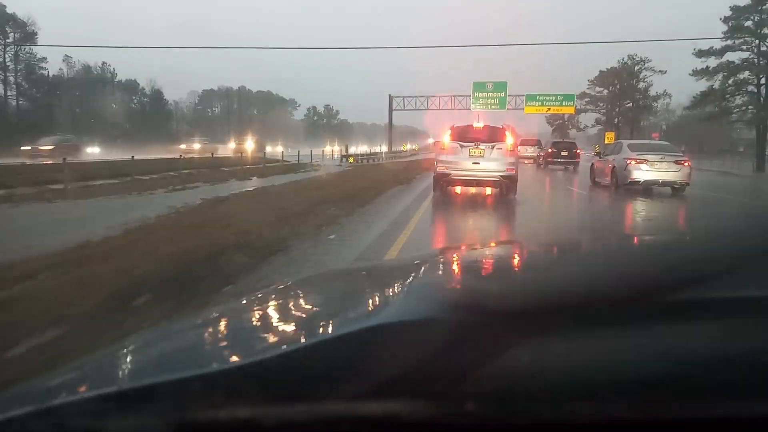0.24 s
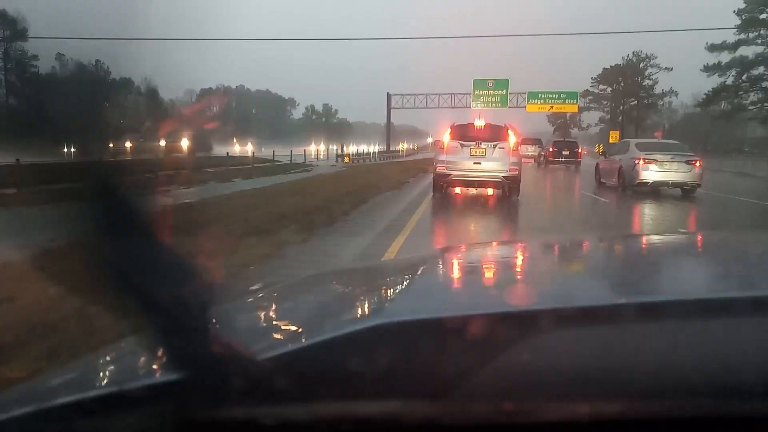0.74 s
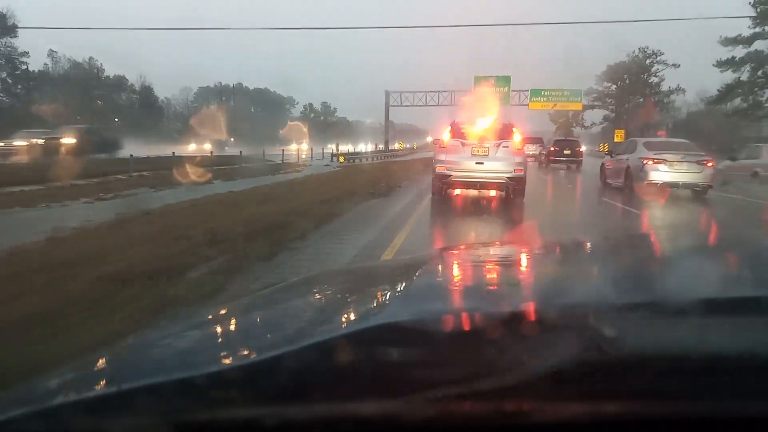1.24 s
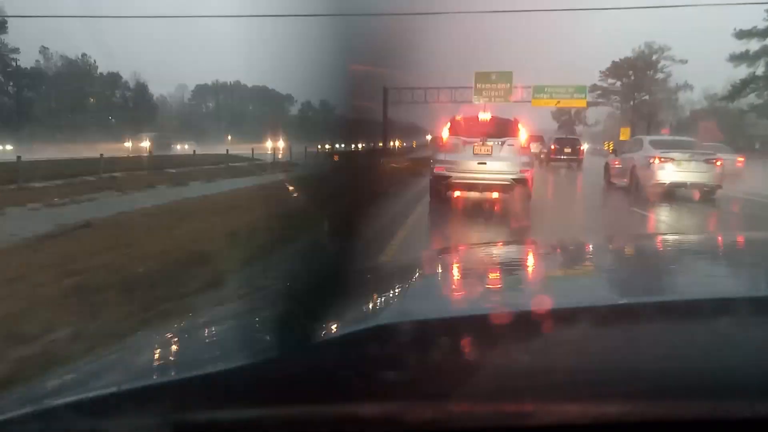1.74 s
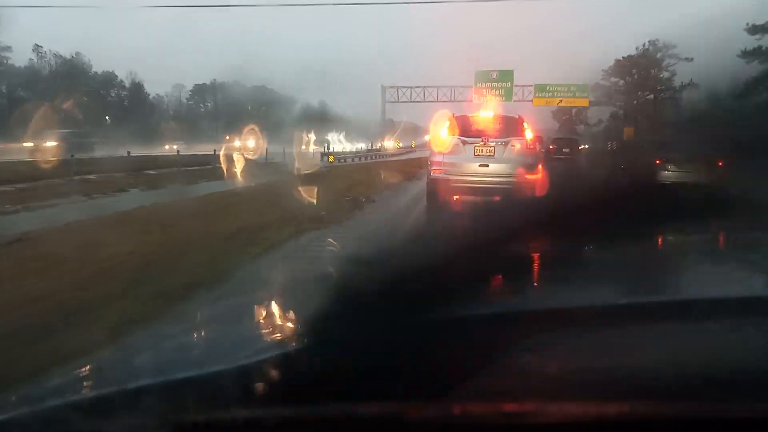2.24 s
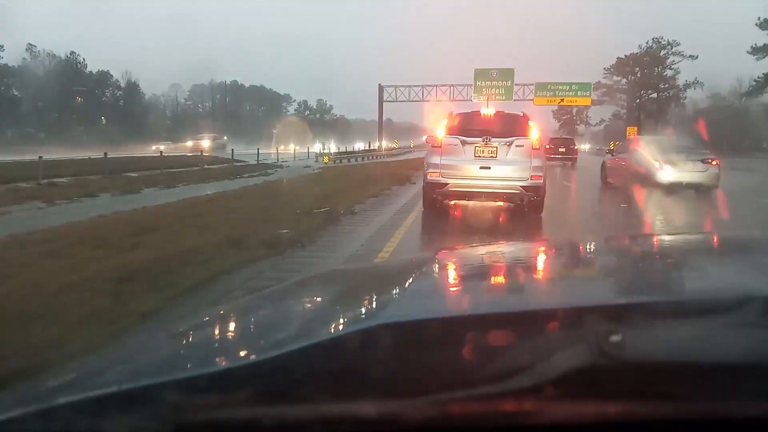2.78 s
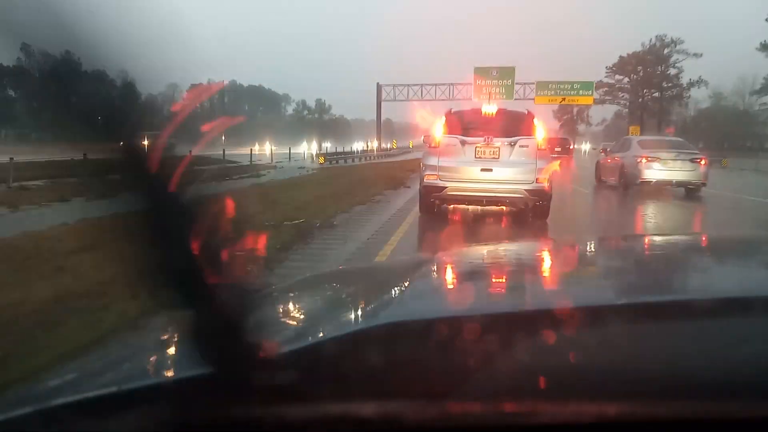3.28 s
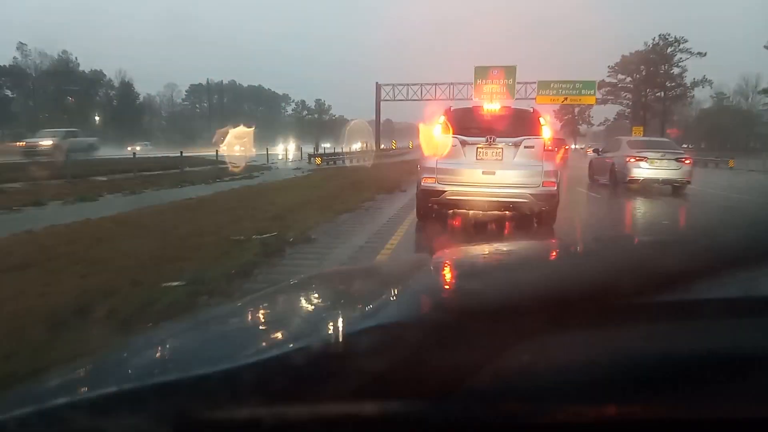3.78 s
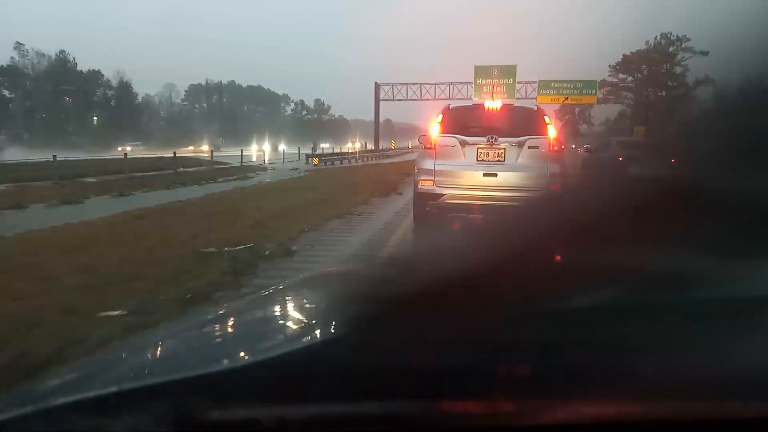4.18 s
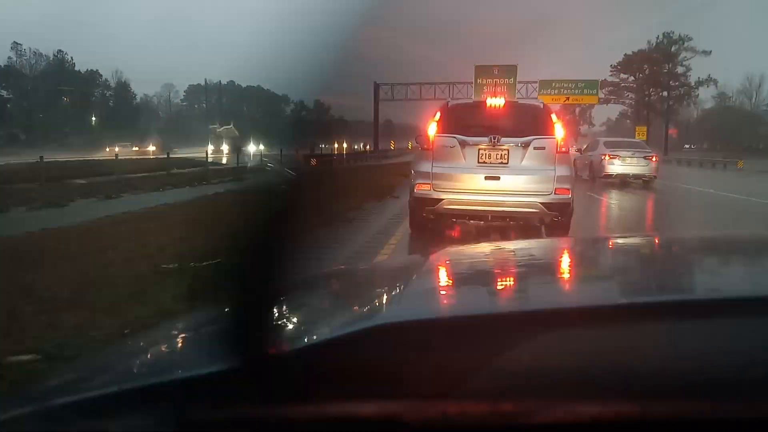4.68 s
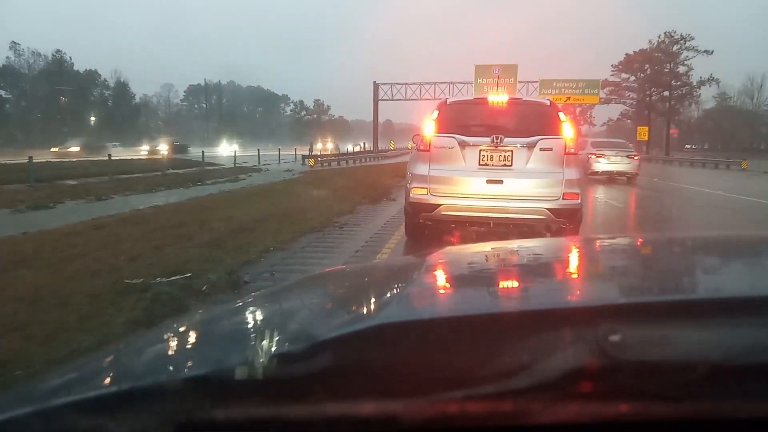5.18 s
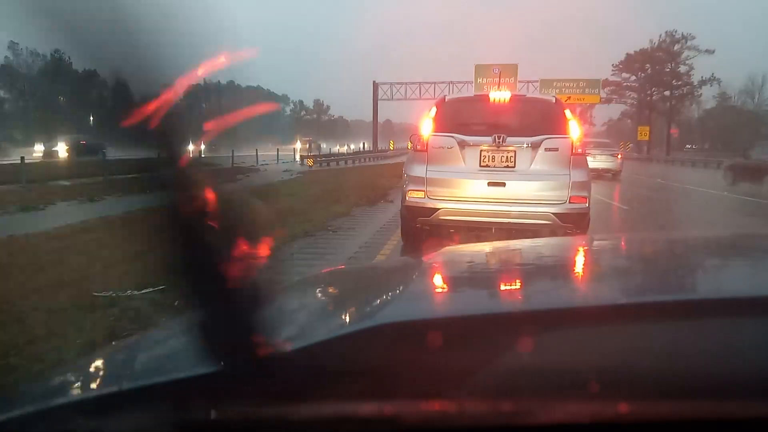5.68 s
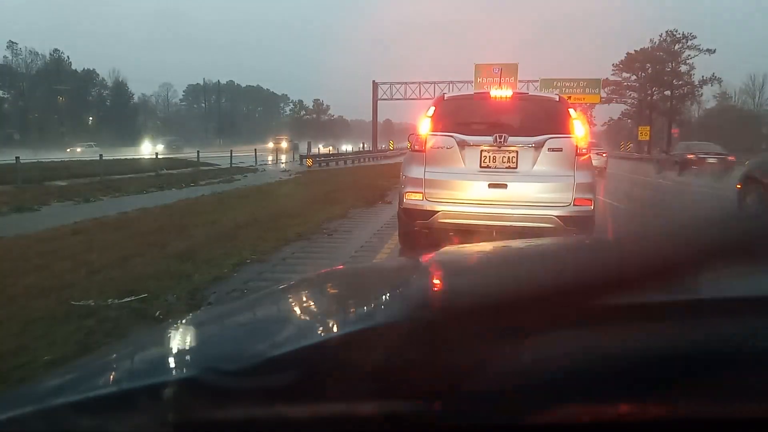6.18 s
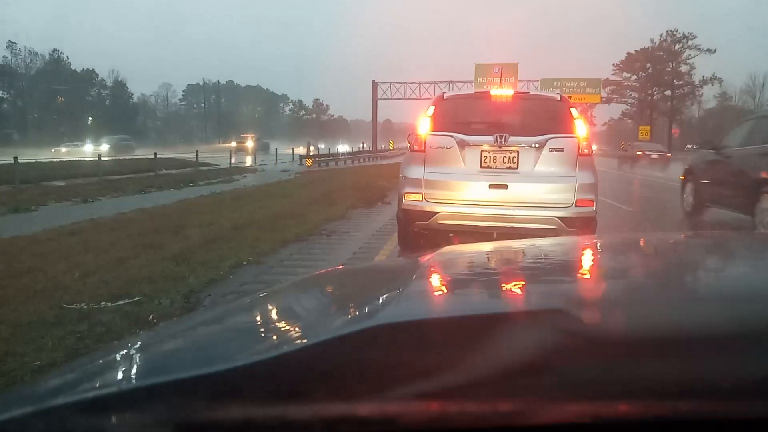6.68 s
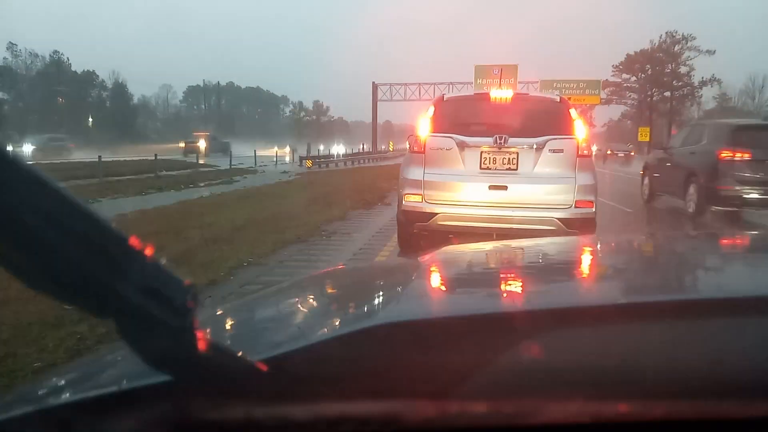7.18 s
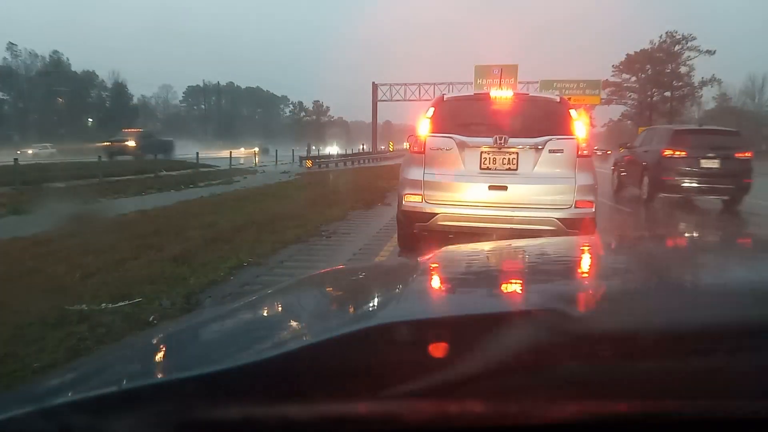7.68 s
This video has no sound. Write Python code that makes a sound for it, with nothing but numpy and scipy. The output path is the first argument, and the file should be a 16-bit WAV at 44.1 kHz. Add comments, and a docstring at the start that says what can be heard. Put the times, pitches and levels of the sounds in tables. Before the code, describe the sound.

From inside a car creeping along a wet highway, fast wipers beat back and forth with soft, round thuds over a low rumble. Dense rain taps and ticks on the glass and roof close to the microphone, with more rain washing behind it. Tyres in the next lane give a dull swish early on and a longer one later, while the finest ticks on the windscreen thin out towards the end.

```python
"""Inside a car creeping along a wet highway in heavy rain, heard at two small microphone ports.
From the start, drops patter on roof and glass over a wash of distant rain; the body drones and the
cabin booms near 90 Hz. From 0.1 s the wipers thump every 0.4 s, at outer end and park in turn,
and judder on leaving park. Tyre spray from the next lane swells at 0.5 s and again from 5 s on.
The finest ticks on the windscreen fade towards the end, near 8 s."""
import sys
import numpy as np
from scipy import signal
from scipy.fft import rfft, irfft
from scipy.io import wavfile
from scipy.ndimage import uniform_filter1d

SR = 44100
rng = np.random.default_rng(int(sys.argv[2]) if len(sys.argv) > 2 else 0)


def log_audio(samples):
    """Write samples as a 16-bit WAV file to the path given in sys.argv[1]."""
    # one column per channel
    frames = np.atleast_2d(samples).T
    # limit to full scale, then quantise
    limited = np.clip(frames, -1, 1)
    pcm = np.round(limited * 32767).astype(np.int16)
    wavfile.write(sys.argv[1], SR, pcm)


N = 349668

# Water levels: t/s, distant wash/dB, near patter/dB, fine ticks/dB, tyre spray/dB
RAIN_LEVELS = [(0.05, -37, -27, -39.5, -50), (0.55, -30.5, -29, -41.5, -36), (1.36, -31, -28.5, -43.5, -40),
               (1.84, -34, -31.5, -52.5, -44.5), (2.63, -31, -30, -49, -42), (4.09, -33.5, -29.5, -51, -38),
               (4.71, -32.5, -29.5, -50, -39.5), (5.03, -31, -30.5, -53, -33),
               (5.98, -29.5, -28.5, -49, -30), (6.32, -31, -30, -50, -33), (7.18, -31.5, -29, -53, -31),
               (7.9, -32, -30.5, -63, -34)]
# Road excitation, fading as the car slows: t/s, lower cabin mode/dB, upper mode/dB, body drone/dB
ROAD_LEVELS = [(0.0, -16, -13.5, -18.5), (0.4, -25, -19.5, -21), (0.77, -20, -18.5, -20),
               (0.99, -22.5, -16, -21.5), (2.58, -21.5, -22.5, -21), (3.73, -24, -17.5, -20),
               (4.35, -30, -22, -21.5), (4.7, -25, -26, -22.5), (6.25, -34, -20.5, -20.5),
               (6.63, -23.5, -36, -21), (6.89, -15.5, -26, -22), (7.07, -42, -31, -22.5),
               (7.44, -28, -30, -20), (7.93, -16, -31, -22)]
# Spectral shapes: f/Hz, relative density/dB
WASH_SPECTRUM = [(210, -37), (350, -3.5), (437, -9.5), (694, -8), (789, -26), (986, -19), (1360, -10.5),
                 (1520, -20.5), (2080, -19), (2910, -22), (3360, -20.5), (7330, -34.5), (9160, -51),
                 (13600, -42), (15800, -41)]
SPRAY_SPECTRUM = [(300, -17), (450, 2.5), (650, 4.5), (900, 0.5), (1300, -35)]
DRONE_SPECTRUM = [(15, -66), (25, -32), (37, -1.5), (63, -9.5), (85, -11), (101, -5.5), (168, -11),
                  (292, -11), (335, -15), (438, -15), (549, -20), (786, -27), (900, -33.5), (1170, -47),
                  (1980, -120)]
DROP_SPECTRUM = [(290, -34.5), (500, 0.5), (794, -6.5), (971, -6.5), (1350, -11), (1500, -11.5),
                 (2090, -15), (3360, -15.5), (3770, -16.5), (7330, -27), (9100, -39), (13200, -34.5),
                 (15800, -47)]
# Resonances of panels and glass, plus a microphone colour peak near 7.9 kHz: f/Hz, width/Hz, lift/dB
COLOUR_PEAKS = [(117.1, 6.2, 5), (301, 32, 2), (7900, 420, 3), (800, 73, 4), (1485, 58, 8), (1583, 120, 5),
                (1770, 61, 5), (1910, 46, 3), (2478, 45, 5), (2330, 140, 1.4), (2660, 33, 3),
                (3340, 86, 3.5), (4150, 65, 4)]
# Lowest modes of the cabin air: f/Hz, rms wander/Hz
CABIN_MODES = [(81, 4.05), (96, 9.07)]
# Noise coherence between ports: f/Hz, left-right correlation
COHERENCE = [(60, 0.73), (110, 0.88), (200, 0.89), (380, 0.75), (700, 0.016), (1290, -0.23), (2380, -0.2),
             (4400, -0.0038), (8120, -0.67), (15000, 0.083)]
# Port mismatch: f/Hz, left minus right/dB
PORT_BALANCE = [(60, -1.5), (130, 0.5), (290, 2), (640, 1.5), (1410, 0.5), (3100, 0.5), (6820, -2),
                (15000, -4.5)]
# Largest drops: t/s, glass tap/dB, bright tick/dB, panel knock/dB, left minus right before limit/dB
BIG_DROPS = [(0.0548, -26, -38, -22, 3), (0.092, -23, -37, -21, -2), (0.1246, -33, -36, -36, -1),
             (0.1817, -21, -27, -19, 2), (0.2019, -25, -29, -29, 5), (0.329, -26, -31, -26, 1),
             (0.4975, -22, -37, -21, 1), (0.5196, -23, -29, -22, 1), (0.5316, -19.5, -36, -30, 2),
             (0.5506, -19, -33, -28, -3), (0.7642, -24, -42, -25, -7), (0.8383, -24, -30, -23, 7),
             (0.989, -19, -44, -33, 3), (1.0794, -20, -31, -28, 2), (1.1784, -25, -32, -27, -2),
             (1.2206, -24, -29, -21, 10), (1.2996, -28, -30, -24, -2), (1.3603, -25, -29, -31, 3),
             (1.3932, -24, -39, -35, -3), (1.4898, -23, -35, -17.5, 5), (1.5778, -21, -29, -19, 3),
             (1.6383, -23, -46, -33, 2), (1.822, -23, -31, -29, -2), (1.8976, -26, -28, -30, -7),
             (1.9789, -24, -34, -28, 0), (2.0371, -25, -44, -29, -9), (2.1332, -36, -31, -24, -2),
             (2.207, -25, -39, -28, -1), (2.2391, -28, -27, -22, 2), (2.253, -25, -34, -20, 1),
             (2.374, -26, -35, -29, 6), (2.507, -23, -30, -17, 2), (2.5502, -22, -35, -18, 1),
             (2.601, -27, -34, -19, 0), (2.6167, -25, -41, -23, -2), (2.694, -23, -31, -20, 2),
             (2.84, -27, -42, -22, 5), (2.88, -22, -36, -34, -1), (2.9068, -22, -25.5, -21, -3),
             (2.965, -27, -41, -18, 0), (2.9827, -23, -28, -20, 3), (3.0096, -29, -28, -23, -2),
             (3.1094, -25, -43, -16.5, 0), (3.1784, -28, -35, -26, 0), (3.246, -28, -39, -32, -1),
             (3.2688, -23, -40, -16, 2), (3.412, -23, -34, -18, 3), (3.446, -34, -46, -15.5, 2),
             (3.829, -24, -30, -25, -2), (4.02, -22, -32, -20, -2), (4.243, -32, -33, -32, 0),
             (4.2761, -31, -36, -32, 0), (4.2886, -26, -42, -33, 0), (4.3319, -29, -34, -33, 2),
             (4.3924, -32, -33, -27, 1), (4.4344, -22, -41, -23, 5), (4.4949, -31, -34, -32, 0),
             (4.5295, -31, -37, -32, 0), (4.5858, -31, -35, -31, 0), (4.599, -28, -31, -24, 1),
             (4.7396, -34, -38, -34, 0), (4.8499, -26, -43, -30, 2), (4.8759, -29, -41, -15, 1),
             (4.891, -27, -42, -20, -1), (4.9948, -27, -44, -22, 5), (5.1976, -31, -38, -32, -2),
             (5.2409, -29, -40, -32, 0), (5.3103, -29, -38, -32, 0), (5.3581, -31, -34, -32, 0),
             (5.388, -27, -40, -25, 0), (5.4618, -29, -38, -32, 0), (5.5658, -30, -39, -32, 0),
             (5.6571, -30, -39, -21, 4), (5.8393, -24, -43, -28, -1), (5.8507, -25, -46, -15.5, -5),
             (5.923, -31, -33, -32, 0), (6.032, -30, -35, -22, 7), (6.0657, -19.5, -42, -25, -2),
             (6.0899, -25, -44, -20, 1), (6.6037, -23, -42, -23, -5), (6.7542, -28, -30, -28, 3),
             (7.251, -36, -29, -22, -2), (7.324, -32, -46, -33, 2), (7.356, -34, -37, -24, 0),
             (7.4311, -33, -41, -32, 0), (7.6597, -23, -50, -26, -4), (7.8674, -32, -51, -21, 3)]
# Tap, tick and knock: low/Hz, high/Hz, t60/s
DROP_BANDS = [(2000, 6000, .011), (6000, 15800, .0045), (600, 2000, .01)]
# Blade reversals, outer end and park in turn:
# t/s, thump/dB, lower cabin mode/dB, upper mode/dB, drone lift/dB
REVERSALS = [(0.097, -4, -17, -21, -3), (0.53, -9, -9, -14.5, 3.5), (0.898, -12, -8.5, -7.5, 2),
             (1.297, -6, -14, -28, 3.5), (1.688, -3.5, -12.5, -17, 1.5), (2.083, -8, -13.5, -13.5, 4),
             (2.492, -4, -24, -15, 2), (2.9, -16, -11.5, -18.5, 4), (3.29, -4.5, -11, -10, -3.5),
             (3.7, -8, -11.5, -12, 2.5), (4.079, -2, -13.5, -21, -0.5), (4.489, -6.5, -13.5, -18, 5),
             (4.869, -3.5, -13.5, -18, 3), (5.298, -4, -14, -15.5, 6.5), (5.668, -5, -11, -18, 0.5),
             (6.088, -3.5, -15, -16.5, 2.5), (6.47, -3.5, -14.5, -18, 4.5), (6.889, -3, -19, -15.5, 6),
             (7.258, -2.5, -11.5, -18, -0.5), (7.657, -5, -9, -20, 4)]
# Judders, relative to the park jolt: delay/s, thump/dB, lower cabin mode/dB, upper mode/dB
PARK_JUDDERS = [(0.095, -2.5, -4, 1.5), (0.19, -9.5, -19, -0.5), (0.26, -10.5, -10.5, -7.5)]
# Frame under the windscreen: f/Hz, relative level/dB, t60/s
FRAME_MODES = [(85.4, 3.5, 0.098), (115, 5.5, 0.068), (152.1, -11, 0.2), (190, -15.5, 0.092),
               (206, -3, 0.067), (241.5, 4, 0.051), (293.6, -8, 0.12)]

MODE_LAG_S, MODE_SWELL_S = (0.025, 0.0035), (0.081, 0.053)  # lower, upper mode
DRAG_RISE_S, DRAG_FADE_S = 0.052, (0.043, 0.47)  # fade: outer end, park
SPLAT_SAMPLES, PORT_LAG_SAMPLES, CUTOFF_HZ = 3000, 24, 15950
LEFT_RIGHT = np.array([[1], [-1]])


def amp(db):
    """dB to gain."""
    return 10 ** (np.asarray(db) / 20)


def unit_rms(x):
    """Scale to rms 1."""
    return x / np.sqrt(np.mean(x ** 2) + 1e-20)


def at_hz(table, hz):
    """Table interpolated over log frequency."""
    f, value = np.transpose(table)
    return np.interp(np.log(hz + 1), np.log(f + 1), value)


def curves(table):
    """Table columns interpolated over time, per sample."""
    t_s, *columns = np.transpose(table)
    return [np.interp(np.arange(N) / SR, t_s, column) for column in columns]


def peak_lift_db(hz):
    """Summed colour peaks of panels, glass and microphone."""
    return sum(db / (1 + (2 * (hz - f) / width) ** 2) for f, width, db in COLOUR_PEAKS)


def convolve(x, taps):
    """Causal convolution, cut to the input length."""
    return signal.oaconvolve(x, taps, axes=1)[:, :x.shape[1]]


def shaped_noise(spectrum, frame, patch_db):
    """Partly coherent stereo noise: given spectrum, colour peaks and drifting patches."""
    hz = np.fft.rfftfreq(frame, 1 / SR)
    re, im, other_re, other_im, patches = rng.standard_normal((4 * N // frame + 5, len(hz), 5)).T
    patches = unit_rms(uniform_filter1d(uniform_filter1d(patches, size=9, axis=0), size=9, axis=1))
    coherence = np.clip(at_hz(COHERENCE, hz), -1, 1)[:, None]
    left = re + 1j * im
    right = coherence * left + np.sqrt(1 - coherence ** 2) * (other_re + 1j * other_im)
    gain = amp((at_hz(spectrum, hz) + peak_lift_db(hz))[:, None] + patch_db * patches)
    _, out = signal.istft(np.array([left, right]) * gain, nperseg=frame, noverlap=frame * 3 // 4)
    return unit_rms(out[:, :N])


def distant_rain():
    """Far drops merged into a wash."""
    return shaped_noise(WASH_SPECTRUM, frame=512, patch_db=0.5)


def tyre_spray():
    """Spray of the next lane, dulled by the doors."""
    return shaped_noise(SPRAY_SPECTRUM, frame=1024, patch_db=0.0)


def body_drone():
    """Road rumble of the panels; the strain of the wiper drive shifts its level, mostly up."""
    t = np.arange(N) / SR
    level_db = curves(ROAD_LEVELS)[2]
    for k, (t_s, *_, lift_db) in enumerate(REVERSALS):
        exponent = np.where(t < t_s, (t - t_s) / DRAG_RISE_S, (t_s - t) / DRAG_FADE_S[k % 2])
        level_db += lift_db * np.exp(exponent)
    return amp(level_db) * shaped_noise(DRONE_SPECTRUM, frame=4096, patch_db=0.5)


def jolts():
    """Reversals plus judders after each park: t/s, thump/dB, lower mode/dB, upper mode/dB."""
    return [np.add(row[:4], offset) for k, row in enumerate(REVERSALS)
            for offset in [(0.0006, 0, 0, 0)] + PARK_JUDDERS * (k % 2)]


def jolt_power():
    """Power fed into each cabin mode: one round swell per jolt."""
    power = np.zeros((2, N + 3 * SR))  # 1 s lead-in
    for t_s, _, *levels_db in jolts():
        for mode, lag_s, half_s, db in zip(power, MODE_LAG_S, MODE_SWELL_S, levels_db):
            t = np.arange(-half_s, half_s, 1 / SR)
            start = round((t_s + lag_s - half_s + 1) * SR)
            mode[start:][:len(t)] += amp(2 * db) * np.cos(np.pi * t / half_s / 2) ** 4
    return power[:, SR:SR + N]


def cabin_boom(flutter_db):
    """Two beating air modes driven by road and wipers; pitch and level wander quickly."""
    out = np.zeros(N)
    drives = zip(CABIN_MODES, curves(ROAD_LEVELS), jolt_power())
    for (hz, wander_hz), road_db, wiper_power in drives:
        smooth = uniform_filter1d(uniform_filter1d(rng.standard_normal((2, N)), size=1200), size=1200)
        wander, flutter = map(unit_rms, smooth)
        power = amp(2 * (road_db + flutter_db * flutter)) + wiper_power
        out += np.sqrt(2 * power) * np.sin(2 * np.pi * np.cumsum(hz + wander_hz * wander) / SR)
    return out


def drop_filter():
    """Causal taps: drop spectrum plus colour peaks."""
    hz = abs(np.fft.fftfreq(8192, 1 / SR))
    log_gain = np.log(amp(np.maximum(at_hz(DROP_SPECTRUM, hz) + peak_lift_db(hz), -90)))
    return np.fft.ifft(np.exp(np.conj(signal.hilbert(log_gain)))).real[None, :2048]


def splat(t60_s, tail_db, tail_t60_s, brightness, shared=0.25):
    """One drop: noise burst and cabin tail; the shared part reaches the left port later."""
    t = np.arange(SPLAT_SAMPLES) / SR
    burst = rng.standard_normal((2, len(t)))
    burst[0] = shared * np.roll(burst[1], PORT_LAG_SAMPLES) + np.sqrt(1 - shared ** 2) * burst[0]
    burst *= amp(-60 * t / t60_s) + amp(tail_db - 60 * t / tail_t60_s)
    burst[:, 1:] -= np.clip(brightness, 0, 1) * burst[:, :-1]  # treble tilt: higher is crisper
    return burst / np.linalg.norm(burst)


def impacts(rate_hz, spread_db, max_spreads):
    """Random impulses, exponentially spread in dB up to a cap."""
    size = amp(spread_db * np.minimum(rng.exponential(1, N), max_spreads))
    return size[None] * (rng.random(N) < rate_hz / SR)


def fine_ticks(rate_hz, spread_db, spots=12):
    """Tiny drops on the windscreen near the ports: very short, treble only."""
    hits = impacts(rate_hz, spread_db, max_spreads=3.5)
    spot, out = rng.integers(0, spots, N), np.zeros((2, N))
    for k in range(spots):
        tick = splat(t60_s=0.004, tail_db=-26, tail_t60_s=0.043, brightness=0.38)
        out += convolve(hits * (spot == k), tick)
    highpass = signal.butter(2, 4500, "high", fs=SR, output="sos")
    return unit_rms(signal.sosfilt(highpass, convolve(out, drop_filter())))


def patter(rate_hz, spread_db, t60_s, ring_gain, spots=40):
    """Near drops of many sizes; each spot on the sheet has its own pan and ringing band."""
    hits = impacts(rate_hz, spread_db, max_spreads=3.2)
    spot, out = rng.integers(0, spots, N), np.zeros((2, N))
    for k, (kind, side, pitch) in enumerate(rng.uniform(-1.023, 1, (spots, 3))):
        drop = splat(t60_s * amp(1.5 * kind), -11.5, tail_t60_s=0.17, brightness=0.39 + 0.64 * kind)
        drop *= amp(7.5 * side * LEFT_RIGHT)
        ring = signal.lfilter(*signal.iirpeak(3000 * 3.43 ** pitch, Q=2.5, fs=SR), drop)
        drop += ring_gain * ring / np.linalg.norm(ring)
        out += convolve(hits * (spot == k), drop)
    return unit_rms(convolve(out, drop_filter()))


def big_drops(tail_db, tail_t60_s):
    """Largest drops: tap, tick and knock, each as strong as the spot lets through."""
    out, taps = np.zeros((2, N + SR)), drop_filter()
    for t_s, *levels_db, pan_db in BIG_DROPS:
        side_db = np.clip(pan_db, -5, 5) / 2 * LEFT_RIGHT
        for db, (low_hz, high_hz, t60_s) in zip(levels_db, DROP_BANDS):
            band = signal.butter(2, (low_hz, high_hz), "band", fs=SR, output="sos")
            burst = splat(t60_s, tail_db, tail_t60_s, brightness=0.69, shared=0.11)
            part = signal.sosfilt(band, convolve(burst, taps))
            peak = np.sqrt(2 * uniform_filter1d((part ** 2).mean(0), size=90).max())
            out[:, round(t_s * SR):][:, :SPLAT_SAMPLES] += amp(db + side_db) * part / peak
    return out[:, :N]


def wiper_thumps(rise_s, detune):
    """Each jolt of the blades rings the frame under the windscreen: a soft, round thud."""
    out, t = np.zeros(N + SR), np.arange(SR // 3) / SR
    for t_s, thump_db, *_ in jolts():
        ring = np.zeros(len(t))
        for hz, db, t60_s in FRAME_MODES:
            offset, half_turns = rng.uniform(-1.13, 1, 2)
            phase = 2 * np.pi * hz * (1 + detune * offset) * t + np.pi * half_turns
            ring += amp(db - 60 * t / t60_s) * np.sin(phase)
        ring *= 1 - np.exp(-t / rise_s)
        out[round(t_s * SR):][:len(t)] += amp(thump_db) * ring / abs(ring).max()
    return out[:N]


def scene():
    """Rain, spray, cabin and wipers, summed in stereo."""
    wash_db, patter_db, ticks_db, spray_db = curves(RAIN_LEVELS)
    near = amp(patter_db) * patter(rate_hz=900, spread_db=3.7, t60_s=0.03, ring_gain=0.47)
    near += amp(ticks_db) * fine_ticks(rate_hz=160, spread_db=6.0)
    far = amp(wash_db) * distant_rain() + amp(spray_db) * tyre_spray()
    cabin = cabin_boom(flutter_db=2.5) + body_drone()
    wipers = wiper_thumps(rise_s=0.035, detune=0.028)
    return far + cabin + near + big_drops(tail_db=-13.5, tail_t60_s=0.13) + wipers


def record(dry):
    """Port mismatch, steep bass cut, soft clip, band limit."""
    balance = amp(at_hz(PORT_BALANCE, np.fft.rfftfreq(N, 1 / SR)) / 2 * LEFT_RIGHT)
    highpass = signal.butter(6, 66, "high", fs=SR, output="sos")
    ports = signal.sosfilt(highpass, irfft(rfft(dry) * balance, N))
    clipped = ports / (1 + abs(ports / 0.99) ** 6) ** (1 / 6)
    lowpass = signal.firwin(1023, CUTOFF_HZ, window=("kaiser", 9), fs=SR)
    return signal.oaconvolve(clipped, lowpass[None], "same")


dry = scene()
out = record(dry)
log_audio(out)
```